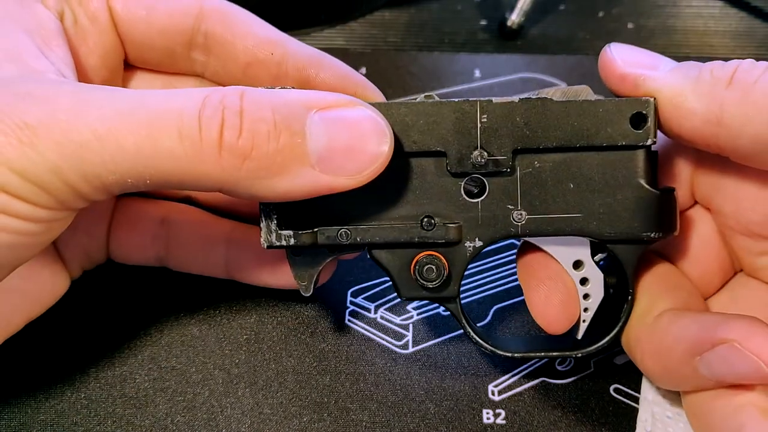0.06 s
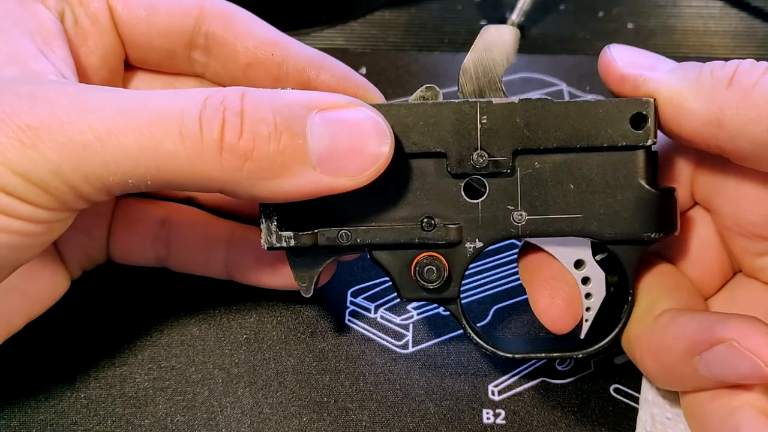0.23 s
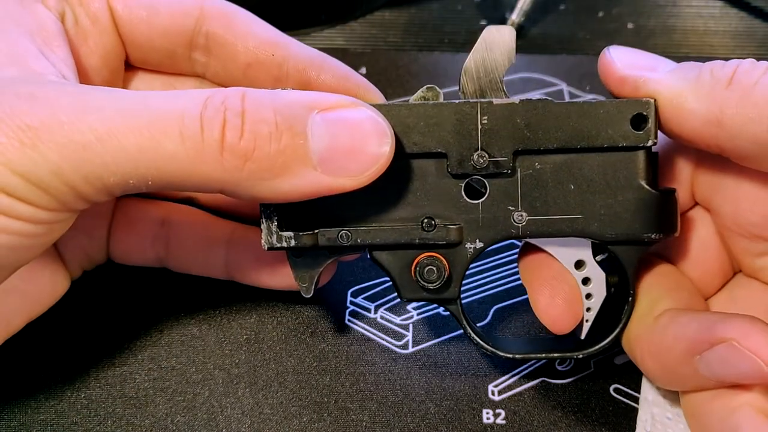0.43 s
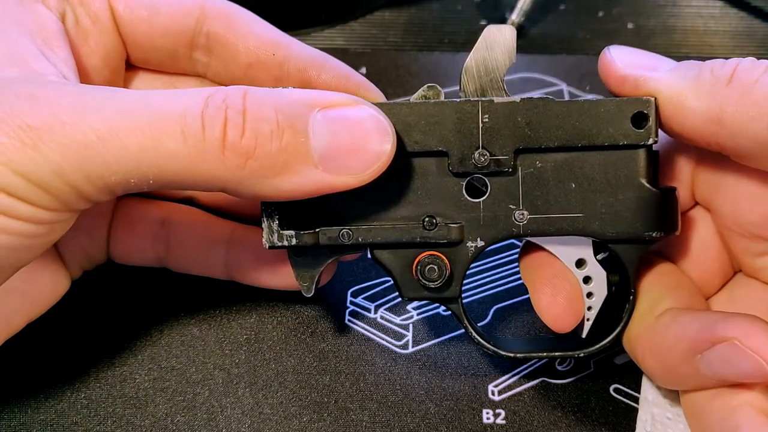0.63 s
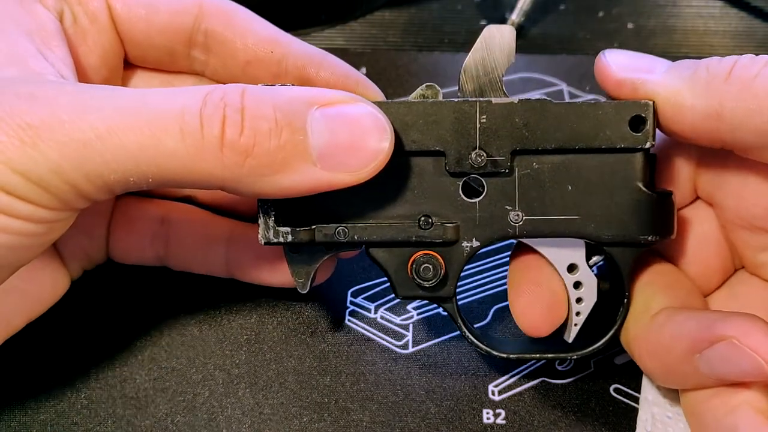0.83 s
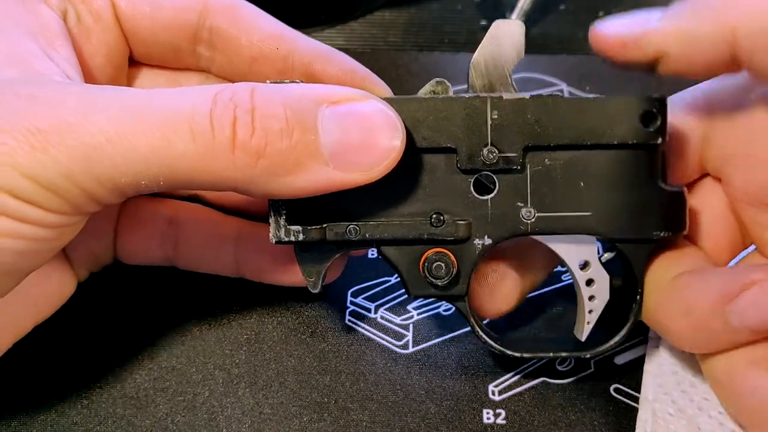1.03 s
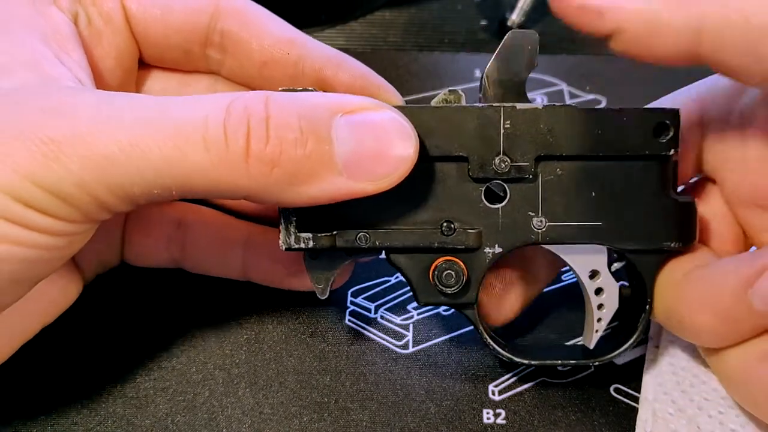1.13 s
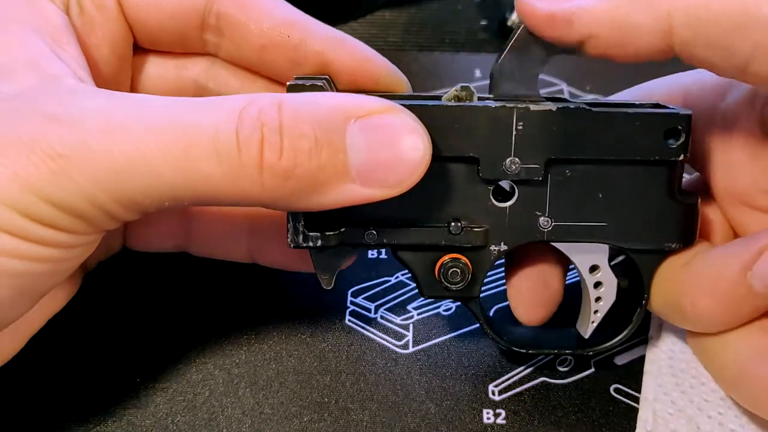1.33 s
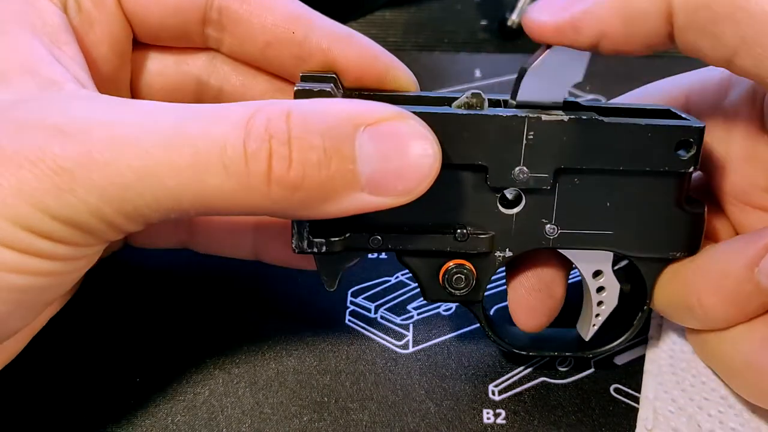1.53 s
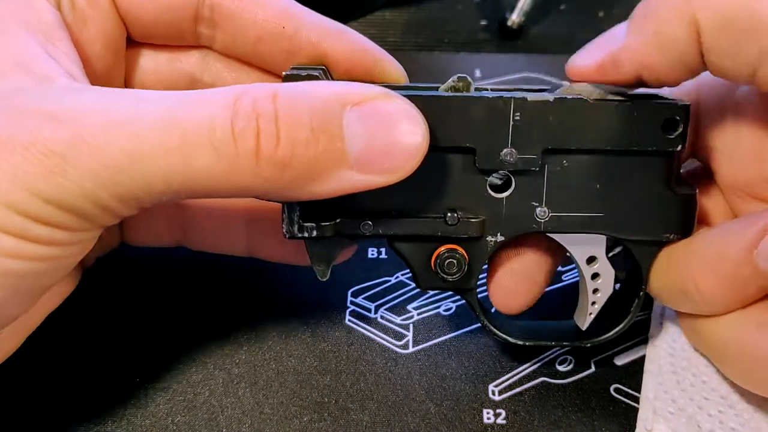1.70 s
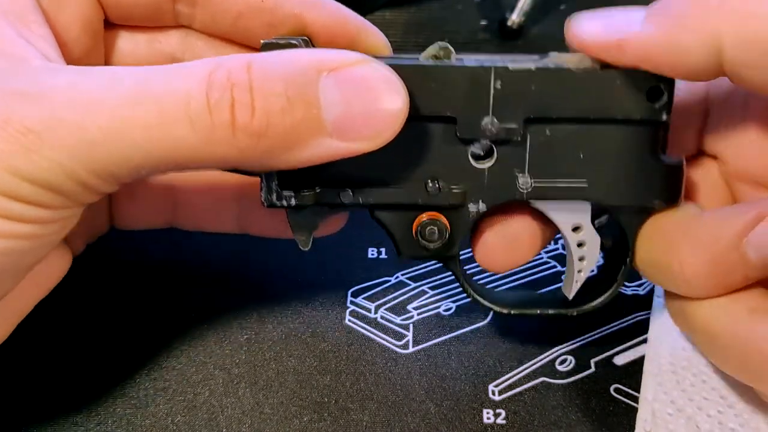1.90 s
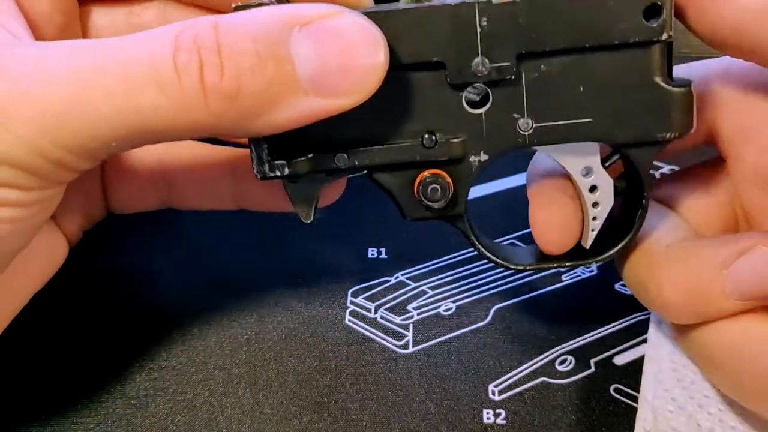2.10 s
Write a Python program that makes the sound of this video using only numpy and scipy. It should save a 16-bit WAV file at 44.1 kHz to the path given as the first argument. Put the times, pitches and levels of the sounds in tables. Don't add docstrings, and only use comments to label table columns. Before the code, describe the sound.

Hammer of a metal trigger mechanism slams early with rapid bounces and brief ringing, distorting the close microphone; after quiet handling ticks, it is cocked with a sharp click and catches solidly, over faint indoor hum and hiss.

```python
import sys
import numpy as np
from scipy import signal
from scipy.fft import rfft, irfft, next_fast_len
from scipy.io import wavfile
from scipy.ndimage import uniform_filter1d, map_coordinates

SR = 44100
rng = np.random.default_rng(int(sys.argv[2]) if len(sys.argv) > 2 else 0)


def wav_out(sig):
    wavfile.write(sys.argv[1], SR, np.round(np.clip(np.atleast_2d(sig).T, -1, 1) * 32767).astype(np.int16))


def magnitude_from_level(level_db):
    exponent = np.asarray(level_db, float) / 20
    return 10 ** exponent


N = 94815

# frequency in Hz, level in dB per Hz.
ROOM_NOISE = [(47, -26), (80, -5.5), (111, -5.5), (140, -15), (295, -10), (362, -18), (900, -29.5),
              (1170, -69.5), (1980, -120)]
# frequency in Hz, level in dB per Hz.
HISS = [(700, 0.5), (1500, -3), (3000, -8), (7000, -10), (9500, -8.5), (10700, -6.5), (12500, -9),
        (15800, -15.5)]
# frequency in Hz, level in dB per Hz.
HUM = [(22, -20), (38, -7.5), (50, 8), (64, -6), (85, -27)]
# middle in seconds, pressure (full scale is 1), width in seconds.
PRESSURE_SWINGS = [(.38, -0.02, .04), (0.68, 0.037, 0.056), (1.38, 0.043, 0.033), (1.691, -0.071, 0.04),
                   (1.833, 0.09, 0.031), (2.02, -0.026, 0.033)]
# frequency in Hz, time to fall 60 dB in seconds.
ROOM_DECAY = [(300, .17), (1200, .25), (5000, .26), (11000, .24), (13000, .22), (15500, .18)]
# start in seconds, length in seconds, level in dB, centre in Hz, width in octaves.
RUBS = [(0.96, 0.07, -57, 1050, 0.25), (0.971, 0.073, -57.5, 4770, 2.2), (1.02, 0.029, -56.5, 10000, .3),
        (1.025, 0.045, -53, 4300, 2.4), (1.654, 0.046, -53.5, 3500, 1.35), (1.727, 0.16, -58.5, 6400, 1),
        (1.92, 0.045, -60, 1400, 0.5), (1.965, .04, -60, 1150, .4), (1.724, .04, -51, 5200, .5),
        (2.085, 0.028, -56.5, 10000, 0.38), (2.086, 0.036, -58.5, 4490, 0.98), (0.7, 0.8, -59, 285, .22),
        (1.05, 0.27, -64, 3480, 4.5), (0, 0.039, -67, 960, 0.51)]
# time in seconds, peak in dB, colour centre in Hz, colour width in octaves.
SLAM_HITS = [
    (0.1976, -13.5, 5200, 0.29),
    (0.2027, 6, 9500, 1.58),
    (0.2047, -3, 5200, 0.11),
    (0.2092, 3.5, 12000, 0.35),
    (0.2145, 2.5, 10000, 1.8),
    (0.2198, -1, 5500, 0.65),
    (0.2229, -2, 10000, 0.56),
    (.2275, -7, 10000, 1.07),
]
# frequency in Hz, level in dB, time to fall 60 dB in seconds.
FRAME_MODES = [(850, -6, .012), (2000, -6, .01), (2560, -4, .012), (3660, -3, .015), (4200, -2, .015),
               (4800, 0, .012), (5750, -2, .015), (6560, 0, .012), (8590, -4, .012), (10400, -3, .01),
               (12400, -3, .01), (14500, -5, .008)]
# frequency in Hz, level in dB, time to fall 60 dB in seconds.
HAMMER_MODES = [(2900, -7, .05), (3300, -8, .04), (3565, -3, .09), (3605, -4, .08), (3990, -9, .04),
                (8740, -3, .025), (10400, 0, .025), (11100, 0, .02), (11480, 2, .025), (11700, 4, .02),
                (12030, 4, .025), (12300, 5, .025), (13000, 2, .015), (14600, 0, .015)]
# frequency in Hz, level in dB per Hz.
RATTLE = [(59, -50.5), (110, -22), (200, -32.5), (420, -25), (1240, -25.5), (2900, -13.5), (5240, -9),
          (9000, 0.5), (12100, 8), (13800, 1), (15400, -1), (15800, -9)]
# frequency in Hz, level in dB per Hz.
KNOCK = [(80, -8), (130, -0.5), (200, -6), (420, 0), (700, -4), (1250, 1), (2200, -2), (3200, -3)]
# time in seconds, peak in dB, colour centre in Hz, colour width in octaves.
TRIGGER_TICKS = [
    (.7607, -45.5, 3630, 0.99),
    (1.0096, -47, 3900, 0.14),
    (1.0096, -47, 12100, .1),
    (1.4742, -54, 3500, 0.22),
]
# frequency in Hz, level in dB, time to fall 60 dB in seconds.
TRIGGER_MODES = [(2020, 3, .035), (2700, -14, .02), (3570, -1, .04), (4050, -4, .025), (4550, -4, .025),
                 (5730, -3, .045), (6520, -5, .035), (7650, -7, .025), (10000, -6, .025), (12000, -4, .03)]
# time in seconds, peak in dB, colour centre in Hz, colour width in octaves.
COCKING_TICKS = [(0.8722, -48, 3945, 0.9), (.934, -54, 6000, 0.69), (1.497, -46, 11420, 0.53),
                 (1.5848, -42.5, 3660, 0.98), (1.6122, -43, 3780, 0.67), (1.6667, -35.5, 4500, 1.06),
                 (1.667, -37.5, 2530, 0.12), (1.924, -37.5, 12400, 0.31), (1.675, -52, 4500, 1.14),
                 (1.683, -44, 4860, 0.58), (1.683, -42, 13000, .15), (1.6998, -28, 6150, 0.39),
                 (1.6998, -34, 12000, 0.27), (1.7136, -17, 5400, .4), (1.7132, -23, 5000, 1.1),
                 (1.7137, -21.5, 11500, 0.45), (1.7137, -30, 2200, .6), (1.7415, -33, 4300, 0.18),
                 (1.667, -43.5, 850, 0.25), (1.5445, -42, 2030, .12), (1.451, -39.5, 3895, 0.18),
                 (1.5429, -35.5, 5400, 0.4), (1.889, -42.5, 6100, 0.65)]
# frequency in Hz, level in dB, time to fall 60 dB in seconds.
SEAR_MODES = [(190, 32, .025), (430, 14, .018), (860, 9, .018), (1150, 2, .016), (1950, -1, .014),
              (2400, -4, .012), (2890, -2, .014), (3250, -1, .014), (3540, 2, .017), (4000, 0, .014),
              (5600, -7, .014), (6600, -6, .01), (8590, -8, .01)]
# frequency in Hz, level in dB, time to fall 60 dB in seconds.
THUD_MODES = [(290, -34, .04), (520, -41, .022), (1100, -45, .025), (1650, -47, .022), (4300, -54, .015),
              (5400, -56, .015)]

LEAD = 44
RATTLE_START_S, RATTLE_RISE_S = .208, .003


def along(points, hz):
    f, value = np.transpose(points)
    return np.interp(np.log(hz + 1), np.log(f + 1), value)


def bell(hz, centre_hz, octaves):
    return np.exp(-.5 * (np.log2((hz + 1) / centre_hz) / octaves) ** 2)


def shape(points):
    return lambda f: magnitude_from_level(along(points, f)) * (f > points[0][0]) * (f < points[-1][0])


def noise(n, gain):
    m = next_fast_len(n + 2048)
    spectrum = rfft(rng.standard_normal(m)) * gain(np.fft.rfftfreq(m, 1 / SR))
    x = irfft(spectrum, m)[:n]
    return x / np.sqrt(np.mean(x ** 2))


def background():
    t = np.arange(N) / SR
    out = magnitude_from_level(-42.5) * noise(N, shape([(4, 5.5), (12, -8.0), (26, -12.5)]))
    for s, pressure, width in PRESSURE_SWINGS:
        out += pressure * np.exp(-.5 * ((t - s) / width) ** 2)
    for db, points in [(-57.5, ROOM_NOISE), (-63, HISS), (-47.5, HUM)]:
        out += magnitude_from_level(db) * noise(N, shape(points))
    return out


def add(out, s, x):
    part = out[round(s * SR):][:len(x)]
    part += x[:len(part)]


def space(x, wet_db=0):
    room_db, room_start_s = -7, .003
    table_db, table_s, smear_s = -8, .0077, .0006
    hz, t, z = signal.stft(rng.standard_normal(SR // 3), SR, nperseg=256)
    fade = magnitude_from_level(-60 * t / along(ROOM_DECAY, hz)[:, None])
    tail = signal.istft(z * fade, SR, nperseg=256)[1]
    tail = tail / np.linalg.norm(tail) * magnitude_from_level(room_db + wet_db)
    echo = np.pad(tail, (round(room_start_s * SR), 0))
    k = round(smear_s * SR)
    bounce = rng.standard_normal(k) * magnitude_from_level(-20 * np.arange(k) / k)
    add(echo, table_s, bounce / np.linalg.norm(bounce) * magnitude_from_level(table_db))
    echo[0] = 1
    return signal.fftconvolve(x, echo)


def finger_rubs():
    out = np.zeros(N)
    for s, length, db, hz, octaves in RUBS:
        n = round(length * SR)
        k = np.arange(n)
        grain = magnitude_from_level(1.4 * map_coordinates(rng.standard_normal(400), [k * 300 / SR]))
        rub = noise(n, lambda f: bell(f, hz, octaves)) * grain * np.sin(np.pi * k / n)
        add(out, s, space(magnitude_from_level(db) * rub))
    return out


def ring(modes, t, scatter_db, gain=lambda hz: 1, wander=0):
    wander_rate, rise_s = 250, .0002
    hz, db, t60 = np.transpose(modes)[:, :, None]
    sign = (-1.) ** np.arange(len(hz))[:, None]
    db = db + scatter_db * rng.standard_normal(hz.shape)
    knots = np.cumsum(rng.standard_normal((len(hz), int(t[-1] * wander_rate) + 3)), 1)
    drift = [np.interp(t * wander_rate, np.arange(len(k)), k - k[0]) for k in knots]
    tones = np.sin(2 * np.pi * hz * t + wander * np.array(drift)) * sign
    fading = gain(hz) * magnitude_from_level(db - 60 * t / t60) * tones
    return np.sum(fading, 0) * (1 - np.exp(-t / rise_s))


def contact(db, hz, octaves, modes, ring_db, wander=.9):
    crack_db, crack_t60, crack_rise_s, crack_end_s = -4, .013, .00025, .05
    t = np.arange(SR // 8) / SR
    k = np.arange(len(t))
    swell = magnitude_from_level(-60 * t / crack_t60) * (1 - np.exp(-t / crack_rise_s))
    z = rfft(np.roll(rng.standard_normal(len(t)) * swell, LEAD))
    z = z / np.sqrt(np.abs(uniform_filter1d(np.abs(z) ** 2, size=40)))
    crack = irfft(z * bell(np.fft.rfftfreq(len(t), 1 / SR), hz, octaves), len(t))
    crack *= np.linalg.norm(swell) / np.linalg.norm(crack)
    crack *= np.minimum(k / LEAD, 1) ** 2 * (t < crack_end_s)
    tone = ring(modes, t, 0.89, lambda f: bell(f, hz, octaves), wander)
    tone = np.roll(tone, LEAD) * (k >= LEAD)
    return magnitude_from_level(db) * (magnitude_from_level(crack_db) * crack + magnitude_from_level(ring_db) * tone)


def hammer_hits(start):
    out, t = np.zeros(SR // 2), np.arange(SR // 3) / SR
    for s, db, hz, octaves in SLAM_HITS:
        add(out, s - start - LEAD / SR, contact(db, hz, octaves, FRAME_MODES, -22))
        tone = ring(HAMMER_MODES, t, 2, lambda f: bell(f, hz, octaves), .8)
        add(out, s - start, (s > RATTLE_START_S) * magnitude_from_level(db - 10.5) * tone)
    return out


def knock():
    t = np.arange(SR // 3) / SR
    swell = (1 - np.exp(-t / RATTLE_RISE_S)) * magnitude_from_level(-19 - 60 * t / .12)
    return noise(len(t), shape(KNOCK)) * swell


def rattle():
    t = np.arange(SR // 3) / SR
    grain = magnitude_from_level(3 * map_coordinates(rng.standard_normal(400), [t * 700]))
    swell = (1 - np.exp(-t / RATTLE_RISE_S)) * magnitude_from_level(-4 - 60 * t / .17)
    return noise(len(t), shape(RATTLE)) * grain * swell


def slam():
    out = np.zeros(N)
    start = SLAM_HITS[0][0] - 2 * LEAD / SR
    blow = hammer_hits(start)
    add(blow, RATTLE_START_S - start, rattle())
    add(blow, .2035 - start, knock())
    add(out, start, space(blow, 1.5))
    recoil = [(48.6, -29, .25)]  # Hz, dB, seconds to fall 60 dB
    add(out, .205, ring(recoil, np.arange(SR // 3) / SR, 0))
    return out


def trigger_resets():
    out = np.zeros(N)
    for s, db, hz, octaves in TRIGGER_TICKS:
        add(out, s - LEAD / SR, space(contact(db, hz, octaves, TRIGGER_MODES, -5, wander=.2)))
    return out


def cocking():
    out = np.zeros(N)
    for s, db, hz, octaves in COCKING_TICKS:
        add(out, s - LEAD / SR, space(contact(db, hz, octaves, FRAME_MODES, -12)))
    return out


def sear_catch():
    out = np.zeros(N)
    add(out, 1.902 - LEAD / SR, space(contact(-22.5, 3300, 1.05, SEAR_MODES, -4)))
    return out


def thud():
    out, t = np.zeros(N), np.arange(SR // 8) / SR
    puff = noise(len(t), lambda f: bell(f, 700, 0.38)) * magnitude_from_level(-48 - 60 * t / .025)
    add(out, 2.0312, space(puff - ring(THUD_MODES, t, 0)))
    return out


def scene():
    mix = slam() + cocking() + trigger_resets() + sear_catch() + finger_rubs() + thud() + background()
    return mix[None]


def roll_off(x):
    return signal.sosfilt(signal.butter(12, 15910, fs=SR, output="sos"), x)


def record(dry):
    top_hz, edge_hz = 15700, 45
    m = next_fast_len(N + 4096)
    above = (np.fft.rfftfreq(m, 1 / SR) - top_hz) / edge_hz
    edge = 1 / (1 + np.exp(np.clip(above, -50, 50)))
    limited = irfft(rfft(dry, m) * edge, m)[:, :N]
    return roll_off(np.clip(limited, -1, 1))


dry = scene()
out = record(dry)
wav_out(out)
```